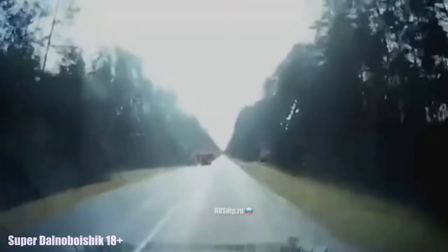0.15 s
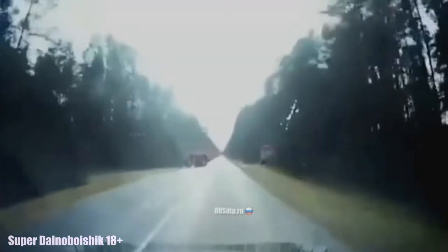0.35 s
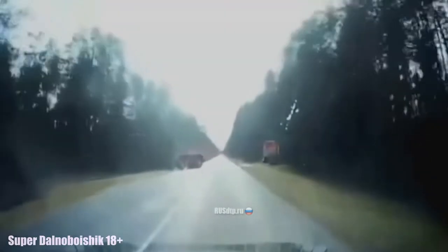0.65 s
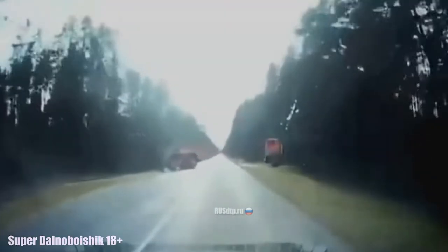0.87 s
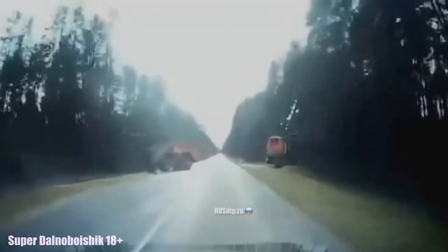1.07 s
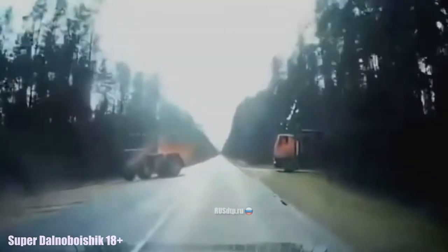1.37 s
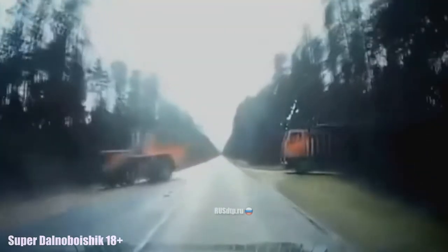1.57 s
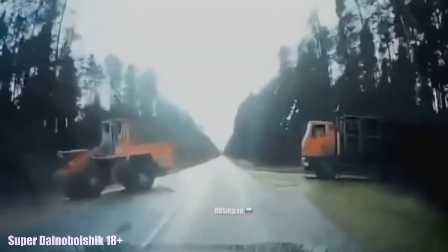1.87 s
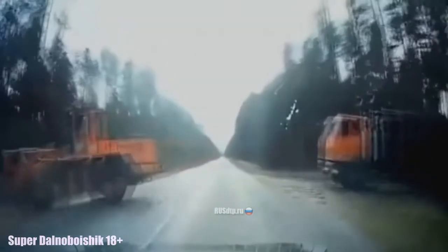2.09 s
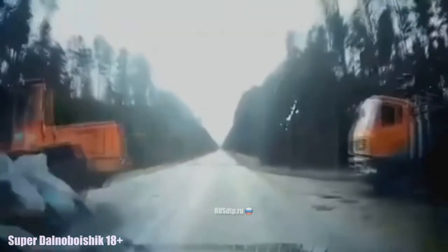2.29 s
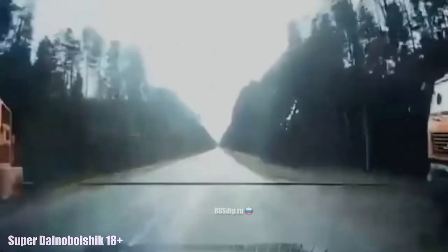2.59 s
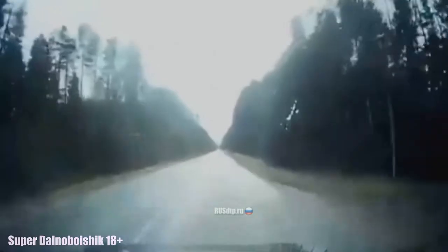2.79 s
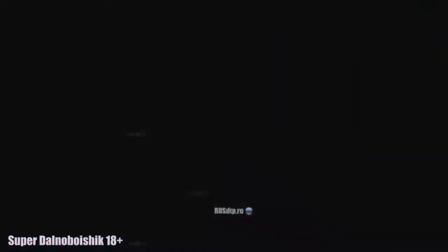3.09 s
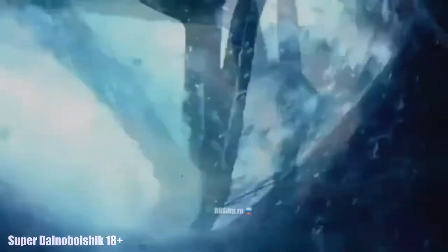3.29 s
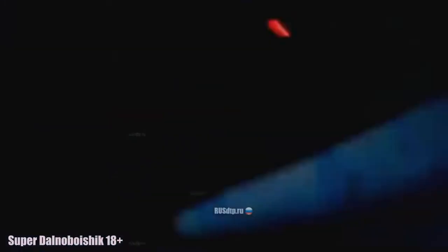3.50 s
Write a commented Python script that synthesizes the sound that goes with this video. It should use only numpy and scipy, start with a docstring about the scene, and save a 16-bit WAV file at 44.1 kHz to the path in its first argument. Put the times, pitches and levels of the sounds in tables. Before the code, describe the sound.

Violent car collision after a few seconds of driving. Inside the cabin, low rumble, thumps and small knocks lead to braking scrub, then booming, crumpling panels and tearing metal, harshly clipped by a cheap dashboard microphone.

```python
"""A car on a forest road, heard from inside the cabin: low rumble and road roar from coloured noise.
Bumps ring the body shell, loose things scuff and knock, and tyres scrub under hard braking.
Then a collision: the body booms and jolts, buckles build into crumpling panels, metal shrieks in wavering tones.
The microphone is a small dashboard camera's: a dull, narrow sound chain that squares off the crash, adds rough
noise and fizz while the sound is clipped, whines and hisses faintly and cuts out once."""
import sys
import numpy as np
from scipy import signal
from scipy.fft import rfft, irfft, next_fast_len
from scipy.io import wavfile
from scipy.ndimage import uniform_filter1d

SR = 44100
rng = np.random.default_rng(int(sys.argv[2]) if len(sys.argv) > 2 else 0)


def to_wav(s):
    """Save 16-bit WAV."""
    ch = np.atleast_2d(s).T  # columns
    pcm = np.round(np.clip(ch, -1, 1) * 32767)  # PCM
    wavfile.write(sys.argv[1], SR, pcm.astype(np.int16))


N = 160965


def undb(db):
    """Amplitude factor for a level in dB."""
    return 10 ** (np.asarray(db) / 20)


def unit(x):
    """Scale to rms 1."""
    return x / np.sqrt(np.mean(x ** 2) + 1e-18)


def clock():
    """Time of every sample in seconds."""
    return np.arange(N) / SR


def curve(table, axis=1):
    """Gain over time along one dB column of a table."""
    rows = np.array(table)
    return undb(np.interp(clock(), rows[:, 0], rows[:, axis]))


def colour(x, points):
    """Filter by a spectrum of (f/Hz, level/dB) points, joined by lines over log frequency."""
    hz, db = np.array(points).T
    size = next_fast_len(N + SR // 2)
    f = np.maximum(np.arange(size // 2 + 1) * SR / size, 1)
    gain = undb(np.interp(np.log(f), np.log(hz), db))
    return irfft(rfft(x, size) * gain, size)[:N]


def noise(points):
    """Coloured noise of rms 1."""
    return unit(colour(rng.standard_normal(N), points))


def envelope(x, seconds):
    """Running rms."""
    window = max(int(seconds * SR), 1)
    return np.sqrt(np.abs(uniform_filter1d(x ** 2, window)) + 1e-12)


def steady(x, seconds):
    """Even out swells slower than the given time."""
    return x / envelope(x, seconds)


def wander(hz):
    """Slow chance of spread 1, moving up to about hz times a second."""
    return noise([(hz / 2, 0), (hz, -4), (hz * 2, -24), (hz * 10, -100)])


def ring_decay(age, t60):
    """Exponential decay that falls 60 dB in t60 seconds."""
    return np.exp(-np.log(1000) * age / t60)


BUMP_RISE_S = 0.0046  # time constant of the soft onset


def soft_onset(age):
    """Exponential rise of a thump or knock."""
    return 1 - np.exp(-age / BUMP_RISE_S)


# levels of the drive inside the cabin: t/s, rumble level/dB, road level/dB before its parts are weighted
DRIVE_LEVELS = [(0, -14.5, -32.5), (.25, -24.5, -34), (.4, -17.5, -34), (.7, -15, -33), (1.1, -15.5, -33.5),
                (1.4, -20.5, -33), (1.62, -21.5, -32), (1.82, -19, -30), (2.02, -10.5, -27.5),
                (2.15, -15.5, -30), (2.45, -18, -31), (2.65, -16, -21), (2.85, -16.5, -25.5),
                (2.92, -11, -30), (3.03, -19, -22.5)]
# rumble spectrum: f/Hz, relative level/dB per Hz
RUMBLE_SPECTRUM = [(4, -17.5), (10, -4), (16, 3.5), (25, -9.5), (41, -6.5), (50, -16), (64, -7.5),
                   (74, -15), (90, -34.5), (200, -75.5)]


def rumble():
    """Low body rumble: deep noise that follows the drive."""
    return steady(noise(RUMBLE_SPECTRUM), 0.3) * curve(DRIVE_LEVELS, axis=1)


# resonances of the body shell: f/Hz, relative level/dB, t60/s
SHELL_MODES = [(131.8, -3.5, 0.36), (187.1, 3, 0.13), (229.1, 1, .13), (281, -2.5, .13), (357, -15, 0.23),
               (419, -14.5, 0.023), (570, -22, 0.055), (682, -26.5, 0.034)]
DRONE_SURGE_DB = 4  # spread of the surges


def shell_drone():
    """The road keeps the body shell humming; each resonance surges and fades by itself."""
    t, out = clock(), 0
    for hz, db, t60 in SHELL_MODES:
        sway = wander(np.log(1000) / (np.pi * t60))  # a damped mode varies faster
        surge = undb(db + DRONE_SURGE_DB * wander(12))
        out = out + surge * sway * np.sin(2 * np.pi * hz * t + wander(12))
    return out


# road roar spectrum: f/Hz, relative level/dB per Hz
ROAD_SPECTRUM = [(50, -12.5), (100, 4), (190, 1), (290, -6), (400, -16.5), (520, -23.5), (720, -35.5),
                 (1000, -39.5), (1400, -37.5), (1620, -34), (1760, -42.5), (2400, -54)]
ROAR_DB, DRONE_DB = -1, -13  # weights of the broad roar and the shell hum


def road():
    """Road noise in the cabin: broad roar plus the hum of the shell."""
    roar = undb(ROAR_DB) * steady(noise(ROAD_SPECTRUM), 0.084)
    return (roar + undb(DRONE_DB) * shell_drone()) * curve(DRIVE_LEVELS, axis=2)


# electronic hiss: f/Hz, relative level/dB per Hz
HISS_SPECTRUM = [(1000, 0), (3000, 2), (6000, 2), (11000, 0), (15000, -15)]
HISS_DB = -83


def hiss():
    """Steady electronic noise of the camera."""
    return undb(HISS_DB) * noise(HISS_SPECTRUM)


# whine that rides on the signal: f/Hz, level/dB
WHINE_TONES = [(3914, -58), (7817, -67), (11700, -72.5)]


def whine(heard):
    """High tones multiplied by the low part of the signal, so they swell and fade with it."""
    low = colour(heard, [(150, -1.5), (600, -22), (1500, -22.5)])
    tones = sum(2 * undb(db) * np.cos(2 * np.pi * hz * clock()) for hz, db in WHINE_TONES)
    return low * tones


# bumps in the road that thump through the suspension: t/s, level/dB
ROAD_BUMPS = [(.327, -26.5), (0.49, -29), (0.725, -30), (1.327, -35.5), (1.49, -25), (1.78, -21),
              (1.886, -35), (2.195, -27), (2.305, -24), (2.511, -32)]


def bumps():
    """Each bump sets the body shell ringing, a little differently every time."""
    out = np.zeros(N)
    chances = rng.standard_normal((len(ROAD_BUMPS), len(SHELL_MODES)))
    for (at, db), chance in zip(ROAD_BUMPS, chances):
        age = np.maximum(clock() - at, 0)
        for (hz, mode_db, t60), z in zip(SHELL_MODES, chance):
            # chance sets the polarity and detunes by about 1 %
            tone = np.sign(z) * np.sin(2 * np.pi * hz * (1 + 0.01 * z) * age)
            out += undb(db + mode_db) * soft_onset(age) * tone * ring_decay(age, t60)
    return out


# loose things shifting in the cabin: t/s at the peak, rise/s, fade/s, level/dB
CABIN_SHIFTS = [(1.196, 0.014, 0.018, -54), (1.276, .03, 0.067, -39), (1.37, 0.047, 0.036, -46),
                (1.65, 0.11, 0.085, -49), (1.799, 0.0067, .015, -44.5), (1.924, 0.0057, 0.013, -28),
                (1.96, .01, 0.032, -45.5), (2.004, .004, 0.025, -41.5), (2.072, 0.0018, 0.007, -38)]
# scuff spectrum: f/Hz, relative level/dB per Hz
SCUFF_SPECTRUM = [(150, -8), (270, 4), (360, 12), (520, -10.5), (800, -14), (950, -9), (1120, -16.5),
                  (1350, -3), (1570, 1.5), (1850, -9.5), (2300, -25), (4000, -44)]


def loose_things():
    """Short noise scuffs as things slide about the cabin, each with its own rise and fade."""
    t, grip = clock(), 0
    for at, rise, fade, db in CABIN_SHIFTS:
        grip = grip + undb(db) * np.exp(-np.maximum((at - t) / rise, (t - at) / fade))
    return grip * steady(noise(SCUFF_SPECTRUM), .02)


DROPOUT_START_S, DROPOUT_END_S = 1.591, 1.610
CLICK_SIZE, CLICK_DECAY_S = 0.042, 0.002  # before the filter
SPIT_DB, SPIT_FADE_S = -55, 0.014  # before the filter


def dropout(x):
    """The sound cuts out for an instant, with a click and a spit of hiss at either end."""
    t, clicks, fades = clock(), 0, 0
    live = uniform_filter1d(1. * ((t < DROPOUT_START_S) | (t > DROPOUT_END_S)), size=60)
    for at in (DROPOUT_START_S, DROPOUT_END_S):
        clicks = clicks + (t >= at) * np.exp(-np.abs(t - at) / CLICK_DECAY_S)
        fades = fades + (t >= at) * np.exp(-np.abs(t - at) / SPIT_FADE_S)
    spit = fades * rng.standard_normal(N)
    edges = CLICK_SIZE * clicks + undb(SPIT_DB) * spit
    return x * live + colour(edges, [(3500, 1.5), (7500, -11), (10000, -36)])


# tyre scrub while braking: t/s, level/dB
BRAKING_LEVELS = [(2.3, -64), (2.5, -35), (2.64, -30), (2.73, -36), (2.82, -29), (2.91, -44.5), (2.98, -32),
                  (3.06, -36)]
# scrub spectrum: f/Hz, relative level/dB per Hz
SCRUB_SPECTRUM = [(120, 4.5), (240, 18), (380, -20), (460, -10), (535, 9.5), (620, -23.5), (800, -30),
                  (1450, -21.5), (1650, -12), (1800, -48), (2400, -46.5)]


def tyre_scrub():
    """Tyres scrub under hard braking: noise in a few narrow bands."""
    return steady(noise(SCRUB_SPECTRUM), 0.13) * curve(BRAKING_LEVELS)


# a heavier object landing in the cabin: t/s, f/Hz, t60/s, level/dB
HEAVY_KNOCK = (3, 338, 0.3, -19)


def knock():
    """A heavier object lands with a hollow knock: one decaying tone."""
    at, hz, t60, db = HEAVY_KNOCK
    age = np.maximum(clock() - at, 0)
    return undb(db) * np.sin(2 * np.pi * hz * age) * ring_decay(age, t60) * soft_onset(age)


# force of the collision before overload: t/s, body boom level/dB, crumpling panels level/dB
CRUSH_LEVELS = [(3.04, -21.5, -58), (3.068, -9, -23), (3.11, -4.5, -18), (3.135, -4, 10), (3.2, 6, 15),
                (3.24, 11, 18), (3.31, 4.5, 6.5), (3.37, 4.5, 11.5), (3.41, 1.5, 7.5), (3.43, 0.5, 4),
                (3.46, 3.5, -5), (3.485, 10, 5), (3.53, 7, 14.5), (3.555, 12, -1), (3.605, 8.5, 2),
                (3.635, 1, 10.5)]
# body boom spectrum: f/Hz, relative level/dB per Hz
BOOM_SPECTRUM = [(10, -12), (25, -2), (65, -3.5), (110, -10.5), (200, -22.5), (600, -60.5)]


def body_boom():
    """The struck body booms: deep noise that follows the force of the collision."""
    return steady(noise(BOOM_SPECTRUM), 0.063) * curve(CRUSH_LEVELS, axis=1)


BUCKLES_PER_S, BUCKLE_SPREAD_DB = 900, 5


def crumple(points):
    """A dense run of buckles and snaps of uneven size: random impulses, coloured and evened out."""
    hits = rng.random(N) < BUCKLES_PER_S / SR
    sizes = undb(BUCKLE_SPREAD_DB * rng.exponential(size=N))
    signs = np.sign(rng.standard_normal(N))
    return steady(colour(hits * sizes * signs, points), .025)


# crumpling panel spectrum: f/Hz, relative level/dB
PANEL_SPECTRUM = [(60, -6), (130, -1), (290, 0), (480, -6.5), (750, -13), (1200, -21), (1600, -17),
                  (2200, -31), (5000, -39)]
# splintering glass and plastic spectrum: f/Hz, relative level/dB
SHARD_SPECTRUM = [(500, -23), (1000, -11.5), (1400, -17.5), (1620, -0.5), (1900, -4.5), (2400, -10),
                  (5000, -23)]
SHARD_DB = -13.5  # relative to the panels


def wreckage():
    """Panels crumple while glass and plastic splinter."""
    shards = undb(SHARD_DB) * crumple(SHARD_SPECTRUM)
    return (crumple(PANEL_SPECTRUM) + shards) * curve(CRUSH_LEVELS, axis=2)


def collision():
    """Boom and wreckage from first contact, with jolts and shrieks; it far exceeds the camera's ceiling."""
    contact = np.clip((clock() - CRUSH_LEVELS[0][0]) / .01, 0, 1)
    return contact * (body_boom() + wreckage()) + jolts() + shrieks()


# heavy jolts that press the microphone to its limit: start t/s, length/s, level/dB before overload
BODY_JOLTS = [(3.067, 0.0099, -2), (3.318, 0.0074, 19.5), (3.449, .022, 25), (3.541, 0.021, 26),
              (3.574, 0.028, 9), (3.599, .018, 26.5)]


def jolts():
    """Each jolt is one push of cabin air; the car rocks one way, then the other."""
    t, out = clock(), 0
    for k, (at, length, db) in enumerate(BODY_JOLTS):
        push = np.sin(np.pi * np.clip((t - at) / length, 0, 1))
        out = out + (-1) ** k * undb(db) * push
    return out


CEILING = 0.44  # clipping level of the camera's input
FULL_OVERLOAD = 1.26  # excess that counts as full overload, in ceilings


def overload_amount(excess):
    """How far the input is overloaded, 0 to 1, from the running rms of what was clipped off."""
    return np.clip(envelope(excess, 0.016) / (FULL_OVERLOAD * CEILING), 0, 1)


# rough noise while the sound is clipped: f/Hz, relative level/dB per Hz
ROUGH_SPECTRUM = [(100, -2.5), (300, 5.5), (900, 3.5), (1650, 2), (2100, -15), (3800, -30), (5600, -24.5),
                  (6300, -44.5)]
ROUGH_DB = -36  # at full overload


def rough_noise(overload):
    """Rough low and middle noise that swells while the sound is clipped."""
    return undb(ROUGH_DB) * overload * noise(ROUGH_SPECTRUM)


# fizz of the overloaded input: f/Hz, relative level/dB per Hz
FIZZ_SPECTRUM = [(200, 7.5), (1500, 10), (2000, 13), (2400, 4), (3800, 3.5), (4500, -9.5), (5700, -8.5),
                 (6150, -24.5), (7300, -22), (8000, -22), (8800, -37), (13000, -49), (14500, -30.5),
                 (15500, -25)]
FIZZ_DB = -16  # relative to the treble envelope
FIZZ_SMEAR_S, FIZZ_HANG_S, FIZZ_HANG = 0.004, 0.029, .5  # quick and slow response, weight of the slow


def fizz(heard, overload):
    """Noise that follows the treble of the overloaded signal."""
    treble = colour(heard, [(100, -34.5), (700, -5.5), (1500, 1)])
    edges = envelope(treble, FIZZ_SMEAR_S) + FIZZ_HANG * envelope(treble, FIZZ_HANG_S)
    return undb(FIZZ_DB) * overload * edges / (1 + FIZZ_HANG) * noise(FIZZ_SPECTRUM)


# shrieks of tearing metal: t/s at the middle, length/s, f/Hz, level/dB before overload
METAL_SHRIEKS = [(3.146, 0.015, 1663, 8), (3.174, .011, 1719, 16.5), (3.198, 0.013, 1630, 17.5),
                 (3.34, .0075, 1544, 34), (3.38, .011, 1665, 15), (3.394, 0.012, 1712, 15.5),
                 (3.528, 0.017, 1611, 12), (3.56, 0.0046, 1804, 11), (3.572, 0.0048, 1583, 10.5),
                 (3.598, 0.0041, 1720, 9), (3.621, 0.012, 1669, 10)]
SHRIEK_WIDTH_HZ = 150  # rms waver of the pitch


def shrieks():
    """Metal scrapes on metal in brief, unsteady tones."""
    t, out = clock(), 0
    waver = SHRIEK_WIDTH_HZ * noise([(40, -18), (150, -1), (400, -6), (1500, -38.5)])
    for at, length, hz, db in METAL_SHRIEKS:
        swell = np.exp(-(2 * (t - at) / length) ** 2)
        phase = 2 * np.pi * np.cumsum(hz + waver) / SR
        out = out + undb(db) * swell * np.sin(phase)
    return out


def scene():
    """All sounds in the cabin, summed at the microphone."""
    driving = rumble() + road() + bumps() + tyre_scrub()
    return (driving + loose_things() + knock() + collision())[None]


# response of the camera after its clipping: f/Hz, level/dB
CAMERA_RESPONSE = [(1000, 1), (1400, -2), (1620, -0.5), (1900, -6.5), (2250, -16.5), (3000, -25.5),
                   (3800, -20.5), (5500, -28), (6200, -41.5), (8000, -43), (9000, -46.5), (15000, -43)]
TOP_HZ = 15700  # edge of the steep lowpass


def record(dry):
    """The dashboard camera clips hard, adds noise and fizz when overloaded, dulls the treble, whines, hisses."""
    clipped = np.clip(dry[0], -CEILING, CEILING)
    overload = overload_amount(dry[0] - clipped)
    heard = colour(clipped, CAMERA_RESPONSE)
    out = dropout(heard + whine(heard)) + fizz(heard, overload) + rough_noise(overload) + hiss()
    lowpass = signal.ellip(8, .2, 70, TOP_HZ, fs=SR, output="sos")
    return signal.sosfilt(lowpass, out)[None]


dry = scene()
out = record(dry)
to_wav(out)
```